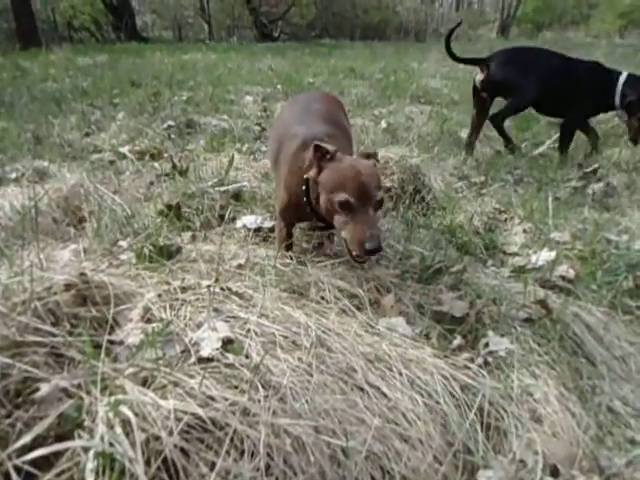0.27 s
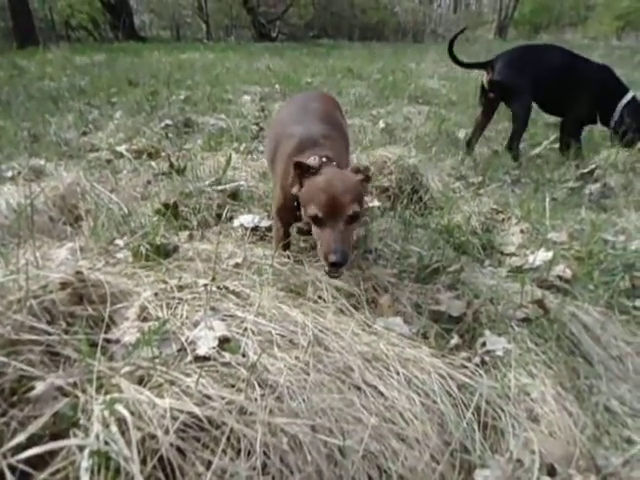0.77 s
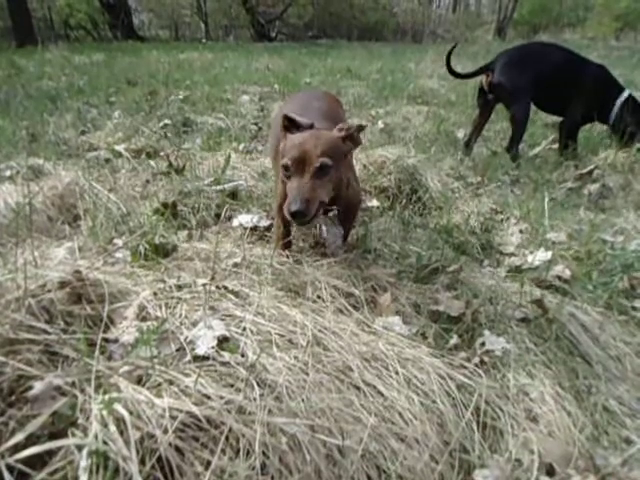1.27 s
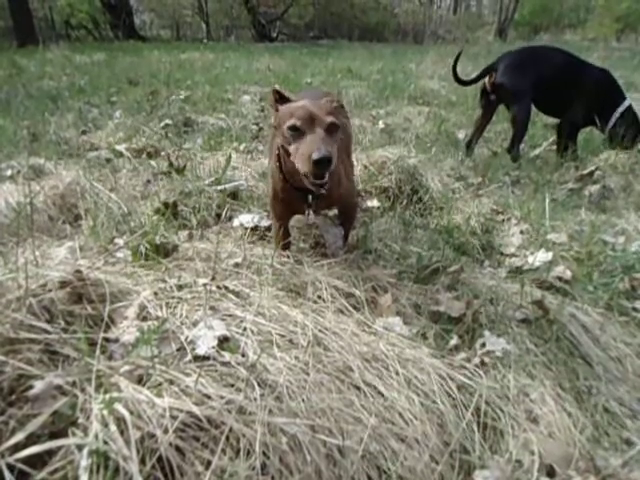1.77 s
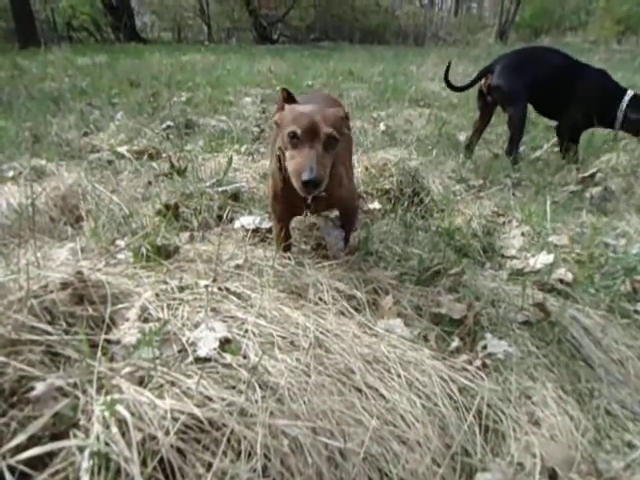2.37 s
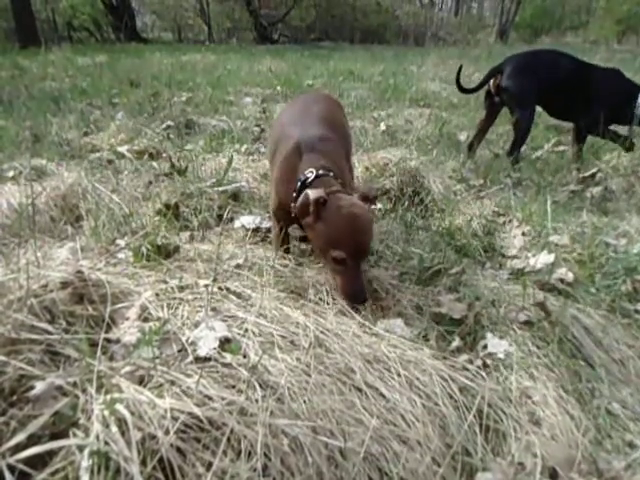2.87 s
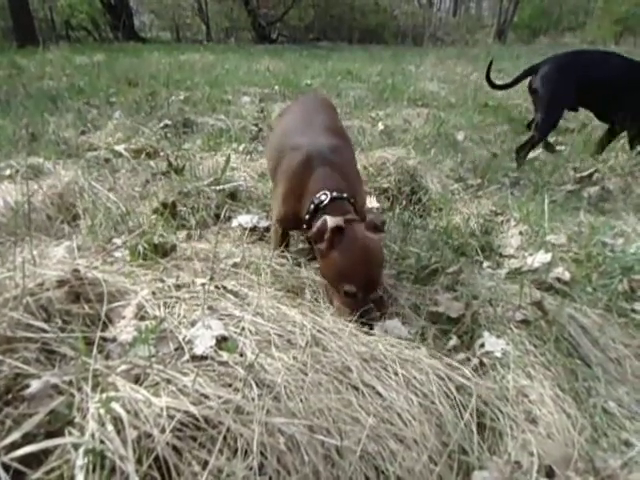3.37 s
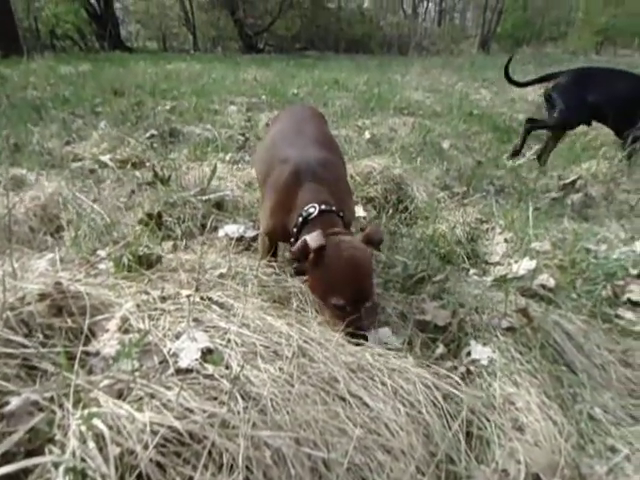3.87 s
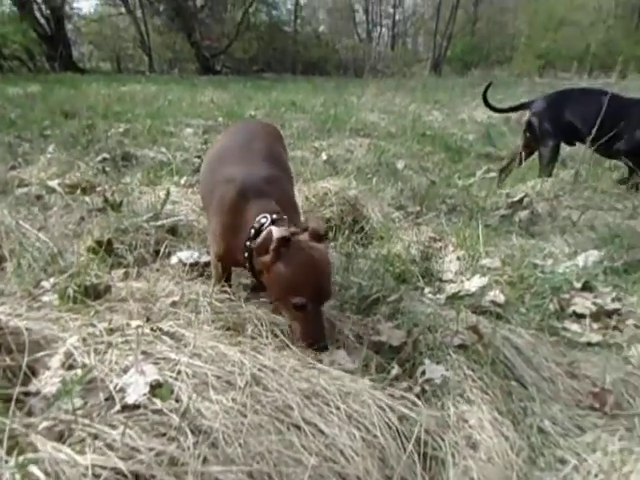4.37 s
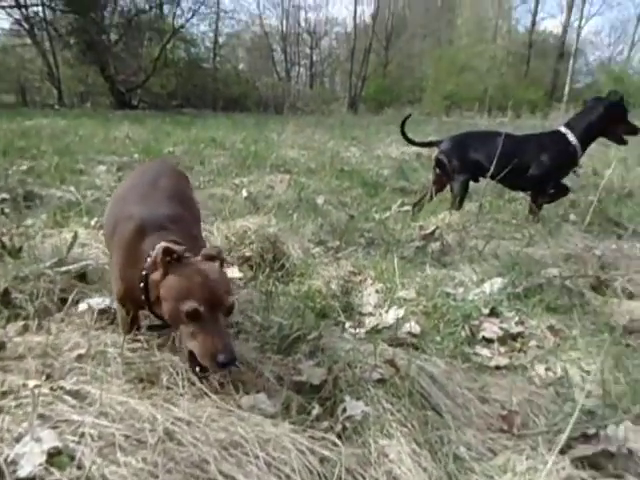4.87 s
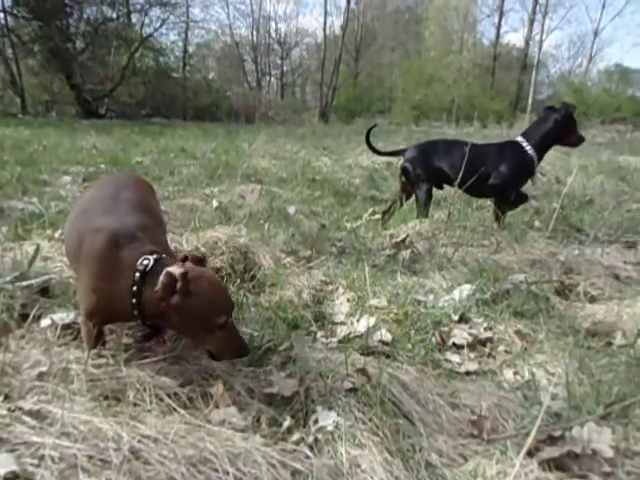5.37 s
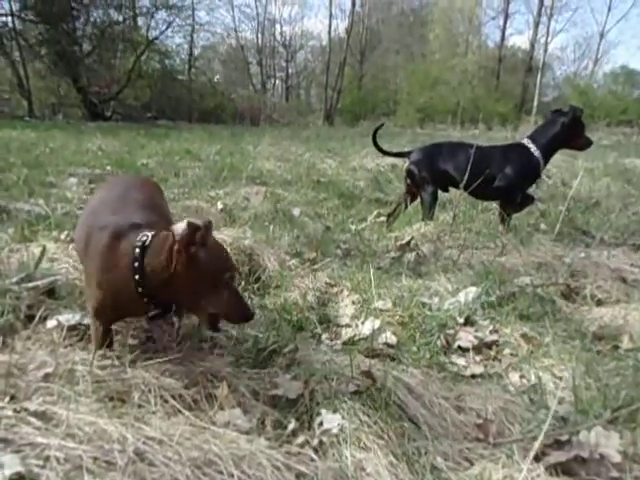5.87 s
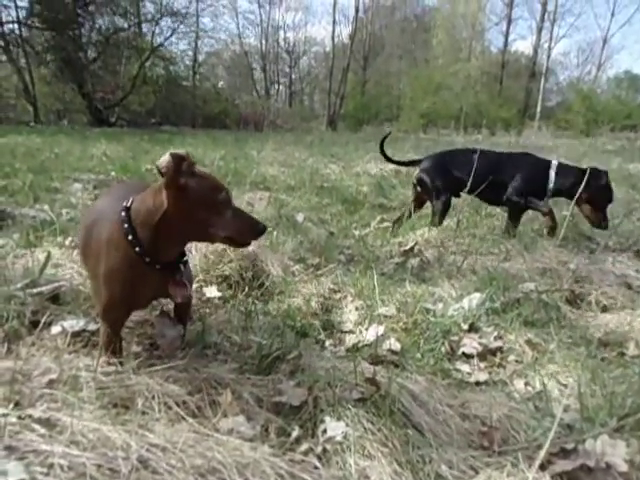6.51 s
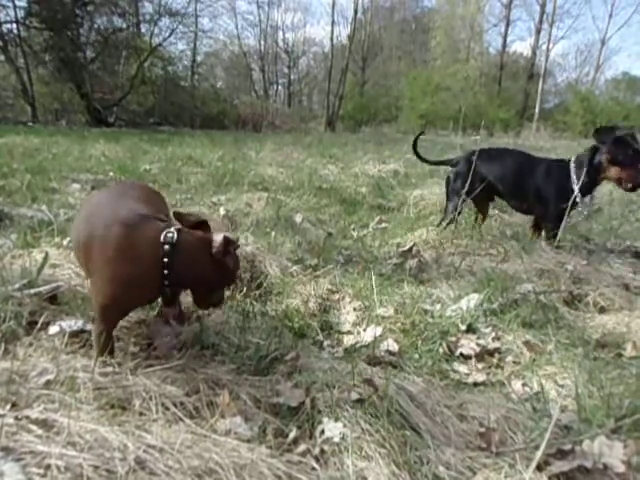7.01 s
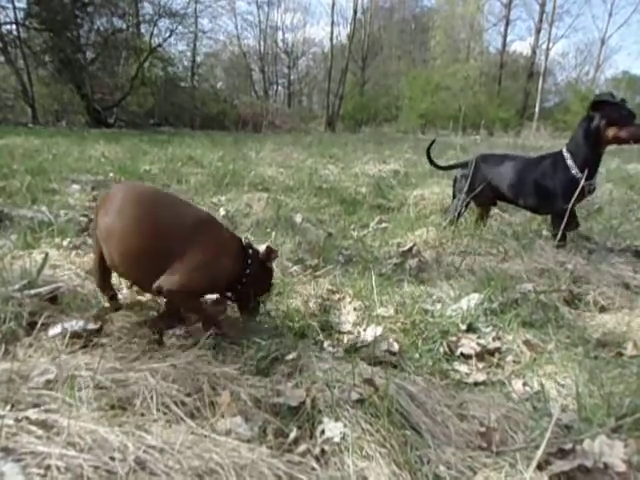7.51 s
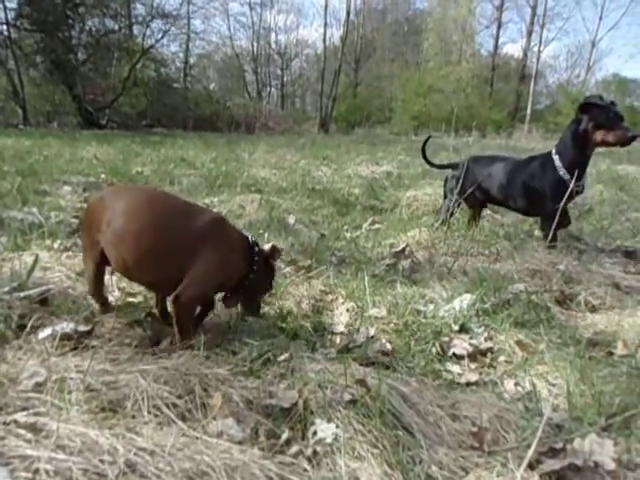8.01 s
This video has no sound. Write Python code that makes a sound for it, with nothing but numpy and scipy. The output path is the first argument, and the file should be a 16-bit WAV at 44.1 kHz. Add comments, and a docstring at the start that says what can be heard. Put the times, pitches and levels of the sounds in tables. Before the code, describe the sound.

Close crunching of hard pellets, dry and irregular, strongest in the first second, with brief gritty grinding and tiny ticks. Behind it lie soft, dull air noise and faint gliding bird chirps. A few quiet brushes of dead grass follow. After almost seven seconds a small dog yips once, abrupt, raspy and clipped, its jaws shut with a hollow pop, and paws scratch through crisp straw. Open field, almost no reverberation, cheap muffled microphone.

```python
"""A quiet meadow: steady far air, and close by a small dog cracking dry kibble and grinding the crumbs.
Small birds whistle far off, and the dog noses through dead grass, snapping and rubbing the stalks.
One short, rough yip close by overloads the narrow-band microphone and pulls its gain down.
The jaws shut with a soft pop; then paws scuff the straw. Cracks are splintering impulses ringing mouth and
teeth, straw is grains in coloured noise, the yip is voice pulses through a throat, birds are gliding sines."""
import sys
import numpy as np
from scipy import signal
from scipy.fft import rfft, irfft
from scipy.io import wavfile
from scipy.ndimage import uniform_filter1d

SR = 44100
rng = np.random.default_rng(int(sys.argv[2]) if len(sys.argv) > 2 else 0)


def transcribe(signal):
    """Save signal, clipped to [-1, 1], as a 16-bit WAV file at the path in sys.argv[1]."""
    frames = np.atleast_2d(signal).T
    limited = np.clip(frames, -1, 1)
    pcm = np.round(limited * 32767).astype(np.int16)
    wavfile.write(sys.argv[1], SR, pcm)


N = 363825
TIME = np.arange(N) / SR  # seconds


def from_db(db):
    """Decibels to gain."""
    return 10 ** (np.asarray(db) / 20)


def rms_one(x):
    """Scale to unit power."""
    return x / np.sqrt(np.mean(x ** 2) + 1e-20)


def cut(x, hz, kind, order=2):
    """Butterworth filter."""
    return signal.sosfilt(signal.butter(order, hz, kind, fs=SR, output="sos"), x + 1e-18)


def colour(x, spectrum):
    """Give a noise a spectrum, drawn straight over log frequency; unit power."""
    hz, db = np.transpose(spectrum)
    bins = np.maximum(np.fft.rfftfreq(N, 1 / SR), 1)
    gain = from_db(np.interp(np.log(bins), np.log(hz), db))
    return rms_one(irfft(rfft(x) * gain, N))


def resonate(x, hz, width):
    """Two-pole resonance with gain 1 on top."""
    r = np.exp(-np.pi * width / SR)
    zeros = np.array([1, 0, -1]) * (1 - r * r) / 2
    poles = [1, -2 * r * np.cos(2 * np.pi * hz / SR), r * r]
    return signal.lfilter(zeros, poles, x + 1e-18)


def wander(hz):
    """Smooth random drift of spread 1, slower than the given frequency."""
    return rms_one(cut(rng.standard_normal(N), hz, "low"))


def swell(start, length):
    """A rounded rise and fall."""
    return np.sqrt(np.maximum(1 - (2 * (TIME - start) / length - 1) ** 2, 0))


def grains(per_s, spread_db):
    """Random tiny fractures of uneven size."""
    sizes = from_db(spread_db * np.minimum(rng.exponential(1, N), 4))
    return (rng.random(N) < per_s / SR) * sizes * rng.choice([-1, 1], N)


# The far air of the meadow and the hiss. Each row: frequency in Hz, relative density in dB per Hz.
AIR_SPECTRUM = [(8, -39.5), (20, 0.5), (130, -1.5), (300, -1), (600, -1.5), (1030, -3.5), (1900, -7.5),
                (3550, -11), (5150, -13), (5450, -28.5), (5950, -28), (6400, -45)]
AIR_DB = -55  # RMS level ahead of the microphone


def air():
    """Steady far rush and hiss: noise with a fixed spectrum."""
    return from_db(AIR_DB) * colour(rng.standard_normal(N), AIR_SPECTRUM)


# Clear cracks of kibble between the teeth, close up.
# Each row: start in seconds, peak in dB before crack_db, mouth resonance in Hz, brightness in dB.
CRACKS = [(0.031, -47, 1460, -27), (0.3717, -28.5, 1750, -18), (0.402, -24.5, 1770, -14.5),
          (0.626, -46, 2130, -23), (0.6618, -34, 1840, -15), (0.687, -28.5, 1820, -29),
          (0.6902, -33.5, 1910, -17.5), (0.9425, -41, 1980, -21), (1.3036, -44, 1640, -19),
          (2.221, -44, 2320, -17), (2.5645, -33, 1600, -5), (2.7631, -41.5, 1180, -17),
          (2.8037, -43, 1170, -8), (2.8264, -44, 1234, -20), (2.965, -46.5, 1410, -7),
          (3.251, -46.5, 1090, -2.5), (3.3547, -45.5, 1340, -2), (4.7154, -39.5, 1620, -16),
          (4.781, -39, 1270, -14), (5.028, -43, 2620, -15.5), (5.258, -48, 2100, -14),
          (5.593, -41.5, 1310, -12)]
# Fragments give way after each crack: longest wait, level against the crack, loudest level before scatter
FRAGMENT_WAIT_S, FRAGMENT_DB, FRAGMENT_TOP_DB = .03, -10.5, -52
LEVEL_SPREAD_DB = 2.5  # scatter of fragments and ticks
# Fainter cracks at random all through the meal; level before scatter and crack_db, pitch before scatter
TICKS_PER_S, TICK_DB, TICK_HZ, TICK_BRIGHT_DB, MEAL_END_S = 2.3, -52.5, 1610, -12, 6.8


def bites(count=40):
    """Every clear crack gets a fragment; fainter cracks fall at random. Rows as in CRACKS."""
    fragments = []
    for s, db, hz, bright_db in CRACKS:
        start = s + FRAGMENT_WAIT_S * rng.uniform(.3, 1)
        level = min(db + FRAGMENT_DB, FRAGMENT_TOP_DB) + LEVEL_SPREAD_DB * rng.normal()
        fragments.append((start, level, hz, bright_db))
    times = np.cumsum(rng.exponential(1 / TICKS_PER_S, count))
    ticks = []
    for s, (size, pitch) in zip(times, rng.standard_normal((count, 2))):
        if s < MEAL_END_S:
            hz = TICK_HZ * 2 ** (.25 * pitch)
            ticks.append((s, TICK_DB + LEVEL_SPREAD_DB * size, hz, TICK_BRIGHT_DB))
    return list(CRACKS) + fragments + ticks


# Ring of teeth and pellet. Each row: frequency in Hz before detuning,
# level in dB before snap_db and brightness, time to fall 60 dB in seconds.
TEETH_RING = [(2550, 4, .006), (3250, 1, .005), (4400, -1, .005), (5050, 0, .006)]


def crack(mouth_hz, bright_db, mouth_t60=0.0058, damping=0.078, snap_db=8, splinter_db=-16,
          splinter_s=0.0035, low_hz=1400, top_hz=5450, size=1764):
    """One fracture and its splinters ring the mouth cavity and the teeth; peak 1."""
    t = np.arange(size) / SR
    splinters = (rng.random(size) < 2500 / SR) * rng.standard_normal(size)
    force = splinters * from_db(splinter_db) * np.exp(-t / splinter_s)
    force[0] = 1
    # open lips let out more treble and damp the cavity
    openness = np.clip(damping * (bright_db + 9), -.4, .65)
    ring = np.sin(2 * np.pi * mouth_hz * t) * from_db(-60 * t / (mouth_t60 * (1 - openness)))
    for k, (hz, db, t60) in enumerate(TEETH_RING):
        # every pellet breaks a little differently
        detune = rng.normal(1, .03)
        decay = from_db(db + snap_db + min(bright_db, -12) - 60 * t / t60)
        ring -= (-1) ** k * np.sin(2 * np.pi * hz * detune * t) * decay
    # the small mouth radiates next to nothing in the bass
    edge_hz = min(0.71 * mouth_hz, low_hz * (1 - 1.1 * max(openness, 0)))
    sound = cut(np.convolve(force, ring)[:size], edge_hz, "high", order=6)
    sound = cut(sound, top_hz, "low", order=8)
    return sound / np.abs(sound).max()


# Crumbs being ground, close up. Each row: start in seconds, length in seconds, level in dB.
CHEWS = [(0.0, 0.043, -56), (0.915, 0.085, -57), (1.26, .06, -62), (4.47, 0.088, -59), (4.66, .07, -59)]


def kibble(crack_db=8, crumb_db=0, crumb_hz=1850, crumb_width=1100):
    """Single cracks, with fine crackle where the crumbs are ground."""
    out = np.zeros(N)
    for s, db, mouth_hz, bright_db in bites():
        sound, at = crack(mouth_hz, bright_db), int(s * SR)
        out[at:at + len(sound)] += from_db(db + crack_db) * sound
    crumbs = resonate(grains(per_s=590, spread_db=4.5), crumb_hz, crumb_width)
    crumbs = rms_one(cut(crumbs, 1200, "high"))
    grinding = sum(from_db(db + crumb_db) * swell(s, length) for s, length, db in CHEWS)
    return out + crumbs * grinding


# The two voices of the farther birds, low and high: pitch in Hz before scatter.
FAR_VOICES_HZ = (3490, 4800)
# FAR_CALLS_PER_S sets the mean pause between notes; FAR_GLIDE is the relative scatter of both pitch ends
FAR_CALLS_PER_S, FAR_CALL_S, FAR_CALL_DB, FAR_GLIDE = 2.0, .075, -67.5, .03


def far_calls(count=40):
    """Short notes at random times, each a little off its bird's pitch. Rows as in CHIRPS."""
    times = np.cumsum(FAR_CALL_S + rng.exponential(1 / FAR_CALLS_PER_S, count))
    scatter = 1 + FAR_GLIDE * rng.standard_normal((count, 2))
    pitches = rng.choice(FAR_VOICES_HZ, (count, 1)) * scatter
    return [(s, FAR_CALL_S, start_hz, end_hz, FAR_CALL_DB)
            for s, (start_hz, end_hz) in zip(times, pitches) if s + FAR_CALL_S < TIME[-1]]


# The nearer of the far-off birds. Each row: start in seconds, length in seconds,
# first pitch in Hz, last pitch in Hz, level in dB before the flutter.
CHIRPS = [(2.01, 0.077, 5100, 4900, -65), (3.123, 0.067, 2950, 3050, -64), (3.455, 0.062, 4450, 4350, -62),
          (4.333, 0.11, 3410, 4300, -60), (5.014, 0.081, 3270, 3370, -57), (5.801, 0.079, 3655, 3390, -63),
          (6.361, 0.083, 3530, 3720, -64), (6.63, 0.12, 4900, 4850, -68), (6.819, .13, 3640, 3590, -63)]


def birds(level_db=0):
    """Thin gliding whistles with a slightly unsteady pitch."""
    out = np.zeros(N)
    unsteady = 1 + .008 * wander(120)
    for s, length, start_hz, end_hz, db in list(CHIRPS) + far_calls():
        span = np.arange(int(s * SR), int((s + length) * SR))
        along = np.linspace(0, 1, len(span))
        hz = (start_hz + (end_hz - start_hz) * along) * unsteady[span]
        whistle = np.sin(np.pi * along) * np.sin(2 * np.pi * np.cumsum(hz) / SR)
        out[span] += from_db(db + level_db) * np.sqrt(2) * whistle
    # the trees make each note flutter
    return out * from_db(2.5 * wander(90) - .5)


# Muzzle, then paws, pushing through straw close by.
# Each row: start in seconds, length in seconds, level in dB before clumping.
SCUFFS = [(3.888, 0.22, -65), (4.457, 0.21, -63.5), (4.695, 0.15, -57), (7.02, .08, -61),
          (7.348, 0.15, -57.5), (7.456, .1, -51), (7.555, 0.18, -52), (7.882, 0.125, -54),
          (8.086, 0.028, -60)]
# Colour of the snapping stalks. Each row: frequency in Hz, relative density in dB per Hz.
STRAW_SPECTRUM = [(1000, -19), (2200, -7.5), (3200, -7), (3900, 2), (4900, 2.5), (6000, -15), (7000, -27)]


def straw(level_db=0, stalks_per_s=900, rub=0.85):
    """Each push snaps dry stalks in clumps and rubs them against each other."""
    snaps = rms_one(grains(stalks_per_s, spread_db=3.0))
    stalks = colour(snaps + rub * rng.standard_normal(N), STRAW_SPECTRUM)
    clumps = from_db(3 * wander(70) - 1)
    pushes = sum(from_db(db + level_db) * swell(s, length) for s, length, db in SCUFFS)
    return stalks * clumps * pushes


# The yip: fade-in starts, peak is reached, peak is held for, throat is shut, length of both fades
YIP_START_S, YIP_PEAK_S, YIP_HOLD_S, YIP_END_S, YIP_SHUT_S = 6.748, 6.792, .015, 6.829, 0.0032
YIP_DB, YIP_RISE_DB_PER_S, YIP_FALL_DB_PER_S = -7, 760, 739.5  # level before surges, slopes


def yip_level():
    """Level in dB under the peak: a steady rise, a short hold, a steady fall."""
    rise = YIP_RISE_DB_PER_S * (TIME - YIP_PEAK_S)
    fall = YIP_FALL_DB_PER_S * (YIP_PEAK_S + YIP_HOLD_S - TIME)
    return np.clip(np.minimum(rise, fall), -120, 0)


# The pitch flicks up and back: floor, top, when it tops, half-width of the flick
YIP_LOW_HZ, YIP_TOP_HZ, YIP_TOP_S, YIP_FLICK_S = 555.5, 821.6, 6.796, .011
YIP_ROUGH = .95  # roughness at full effort (0-1)
# Gain on the upper throat resonances at no effort and at full effort
YIP_SOFT_BRIGHT_DB, YIP_FULL_BRIGHT_DB = -1, -5.5
# Throat and open mouth. Each row: frequency in Hz, width in Hz, gain in dB (upper two before brightness).
THROAT = [(600, 140, -17), (1110, 220, 0), (2400, 360, -3), (3600, 500, -13)]
# At its loudest the yip surges twice and overloads the microphone.
# Each row: start in seconds, extra level in dB.
SURGES = [(6.787, 7.5), (6.8012, 6.5)]
SURGE_S = .005


def yip(tilt_db=-3.5, top_hz=4400, jitter=0.034, rasp=0.29, doubling=1.3, count=9):
    """Vocal folds that fall into uneven strong-weak beats at full effort, through the throat."""
    effort = from_db(yip_level())
    flick = 1 / (1 + ((TIME - YIP_TOP_S) / YIP_FLICK_S) ** 2)
    pitch = YIP_LOW_HZ + (YIP_TOP_HZ - YIP_LOW_HZ) * flick
    rough = YIP_ROUGH * effort ** .7
    bright_db = YIP_SOFT_BRIGHT_DB + (YIP_FULL_BRIGHT_DB - YIP_SOFT_BRIGHT_DB) * effort
    db = YIP_DB + sum(extra_db * swell(s, SURGE_S) for s, extra_db in SURGES)
    sounding = np.clip(np.minimum(TIME - YIP_START_S, YIP_END_S - TIME) / YIP_SHUT_S, 0, 1)

    shaky_pitch = pitch * (1 + jitter * rough * wander(300))
    phase = 2 * np.pi * np.cumsum((sounding > 0) * shaky_pitch) / SR
    # harmonics fall by tilt_db per octave
    harmonics = (from_db(tilt_db * np.log2(k)) * np.cos(k * phase) for k in range(1, count + 1))
    pulses = rms_one(sum(harmonics))
    # half the pitch makes every other beat weaker
    folds = pulses * (1 + doubling * rough * np.cos(phase / 2 + .5 * wander(150)))
    folds += rasp * (1 + rough) * (1 + np.cos(phase)) * rng.standard_normal(N)

    formants = [(-1) ** k * from_db(gain) * resonate(folds, hz, width)
                for k, (hz, width, gain) in enumerate(THROAT)]
    # at full effort the main resonance takes over from the two upper ones
    voice = sum(formants[:2]) + from_db(bright_db) * sum(formants[2:])
    voice = cut(voice, top_hz, "low", order=3)
    # level out the beats over 110 samples, then apply the yip's own level
    voice /= np.sqrt(np.abs(uniform_filter1d(voice ** 2, size=110)) + 1e-12)
    return cut(voice * from_db(db) * effort * sounding, 560, "high", order=6)


# The jaws shutting after the yip, close up. One row: start in seconds, peak in dB,
# mouth resonance in Hz, length in seconds.
JAW_POP = (6.8575, -32, 1100, .006)


def jaw_pop():
    """A soft, hollow pop: a few cycles of the mouth resonance."""
    s, db, hz, length = JAW_POP
    return from_db(db) * swell(s, length) ** 2 * np.sin(2 * np.pi * hz * (TIME - s))


# The dog's sounds thrown back from the ground. Each row: delay in seconds, level in dB before the bass cut.
ECHOES = [(.015, -15), (.026, -35)]


def meadow(x, scatter_db=-43, scatter_t60=.2, echo_low_hz=1800, size=11025):
    """Thin early echoes and a faint, short scatter from the grass."""
    echoes = sum(from_db(db) * np.interp(TIME - delay, TIME, x) for delay, db in ECHOES)
    echoes = cut(echoes, echo_low_hz, "high", order=4)
    tail = cut(rng.standard_normal(size), 1800, "high") * from_db(-60 * TIME[:size] / scatter_t60)
    scatter = signal.fftconvolve(x, tail / np.linalg.norm(tail))[:N]
    return x + echoes + from_db(scatter_db) * scatter


def scene():
    """The dog in front, birds and air behind."""
    dog = meadow(kibble() + yip() + jaw_pop())
    return (dog + straw() + birds() + air())[None]


# The microphone's band edge, hard ceiling (1 = full scale) and last low-pass
BAND_HZ, CEILING, CUTOFF_HZ = 6750, .71, 16000


def record(dry, threshold_db=-4, squeeze=0.2, release_db_per_s=0.15, rail=0.65, fold_knee=1.0,
           fold=2.1, fold_depth=0.64):
    """Slow gain control, an overloaded input, a narrow band and a hard ceiling."""
    level_db = 20 * np.log10(np.abs(dry[0]) + 1e-9)
    over = np.maximum(level_db - threshold_db, 0) * squeeze
    # the gain cut holds its highest value and lets go slowly
    release = release_db_per_s * TIME
    held = np.maximum.accumulate(over + release) - release
    x = dry * from_db(-cut(held, 17, "low", order=1))
    rounded = x / (1 + (x / rail) ** 6) ** (1 / 6)
    # the deepest troughs fold back upwards, which adds a thump and a buzz
    x = rounded + np.clip(fold * (-x - fold_knee), 0, fold_depth)
    x = signal.sosfilt(signal.cheby2(16, 80, BAND_HZ, fs=SR, output="sos"), x)
    return cut(np.clip(x, -CEILING, CEILING), CUTOFF_HZ, "low", order=24)


dry = scene()
out = record(dry)
transcribe(out)
```